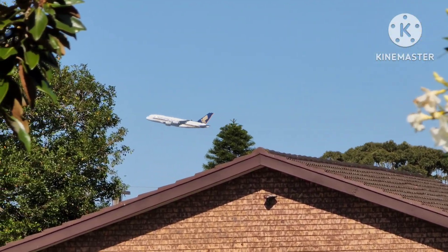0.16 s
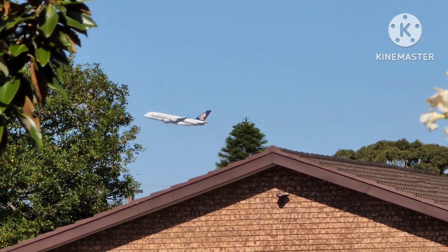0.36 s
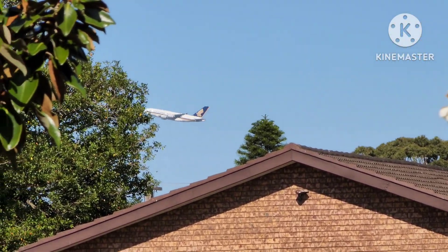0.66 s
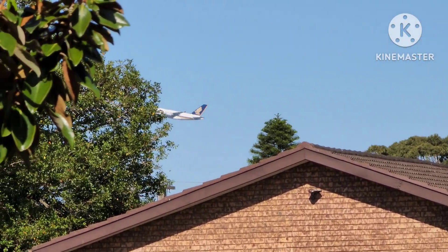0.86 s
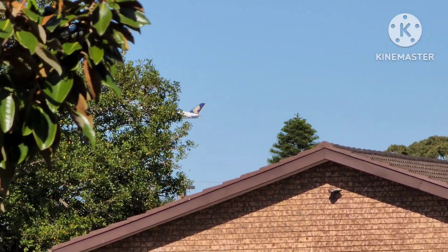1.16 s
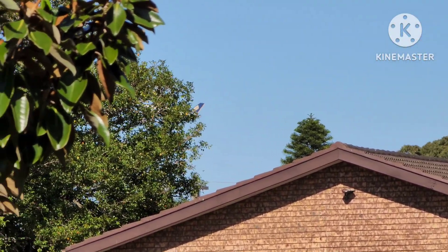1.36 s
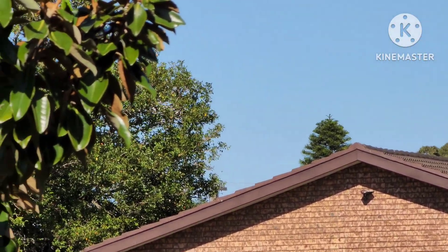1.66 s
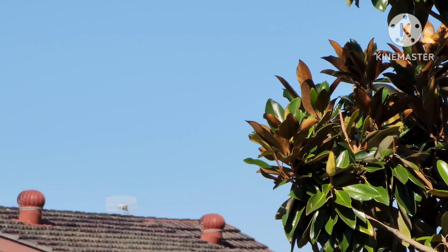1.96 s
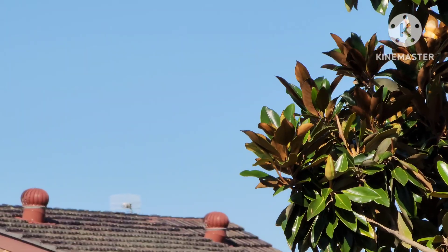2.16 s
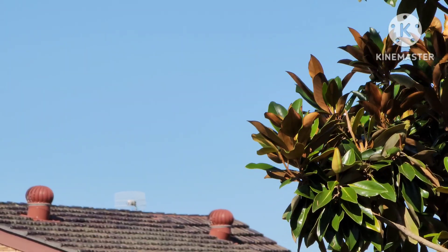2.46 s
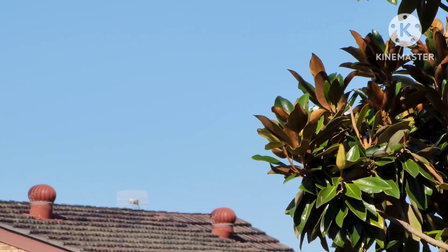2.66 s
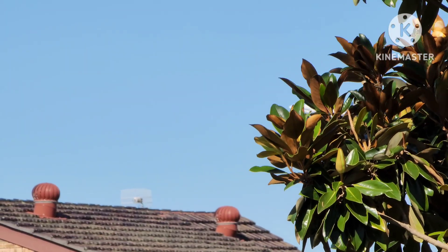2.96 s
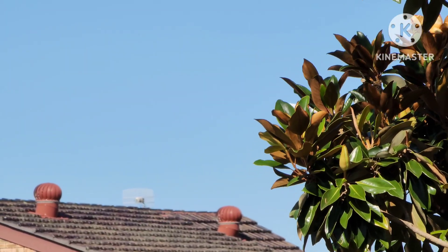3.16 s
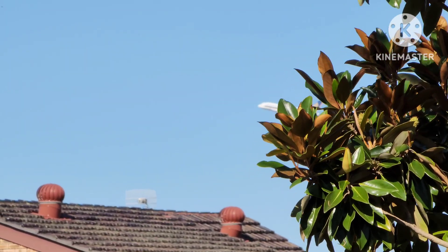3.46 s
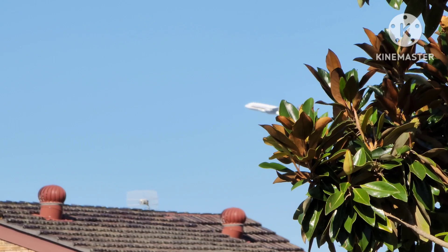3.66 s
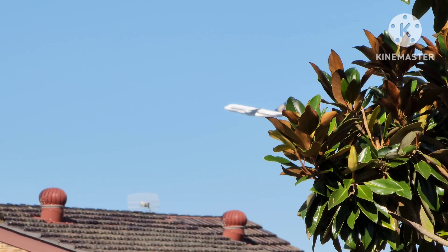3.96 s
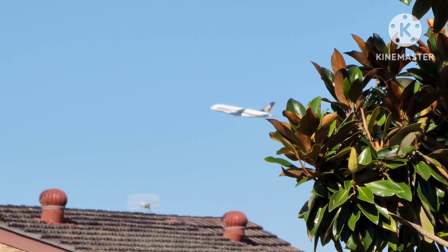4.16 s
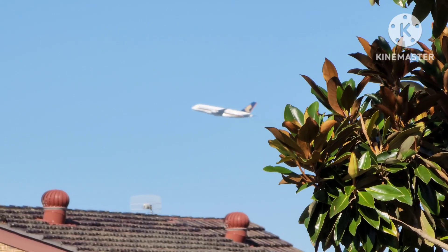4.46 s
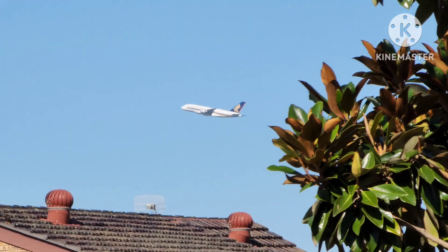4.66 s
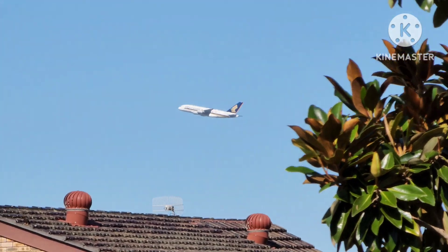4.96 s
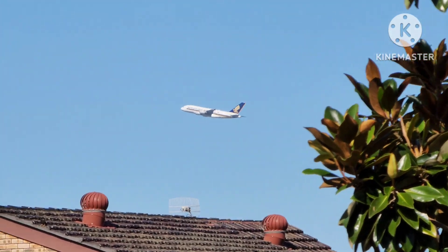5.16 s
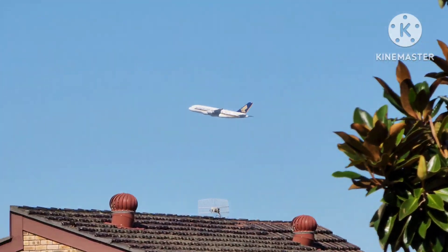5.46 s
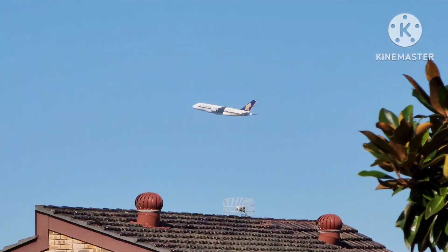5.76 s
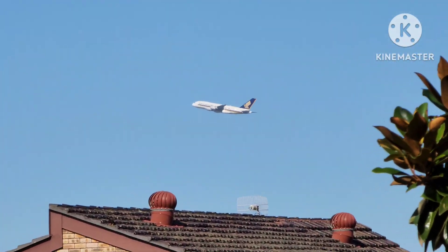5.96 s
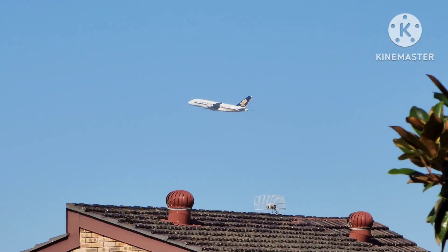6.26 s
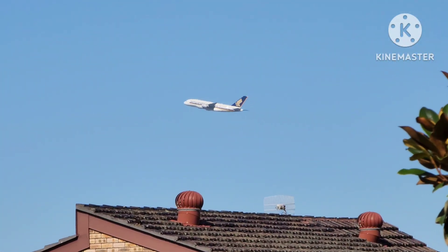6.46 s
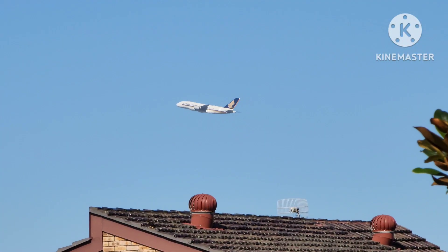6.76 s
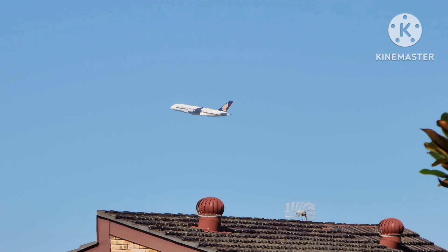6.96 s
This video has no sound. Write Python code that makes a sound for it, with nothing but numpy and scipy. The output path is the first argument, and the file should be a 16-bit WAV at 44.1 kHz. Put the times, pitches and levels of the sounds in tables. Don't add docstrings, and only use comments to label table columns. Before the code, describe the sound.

Distant jet airliner rumbles and drones low over gardens, wind thumping the microphone, leaves rustling, then a hard cut and a close bird warbling and buzzing.

```python
import sys
import numpy as np
from scipy import signal
from scipy.io import wavfile
from scipy.ndimage import uniform_filter1d

SR = 44100
rng = np.random.default_rng(int(sys.argv[2]) if len(sys.argv) > 2 else 0)


def bounce(signal):
    frames = np.transpose(np.atleast_2d(signal))
    limited = np.clip(frames, -1, 1)
    pcm = np.round(limited * 32767).astype(np.int16)
    wavfile.write(sys.argv[1], SR, pcm)


def undo_db(level):
    steps = np.asarray(level, float) / 20
    return 10 ** steps


N = 313551
CUT_S = 1.9105


def evened(x):
    return x / np.sqrt(np.mean(x ** 2) + 1e-20)


def read(points, hz):
    f, value = np.transpose(points)
    return np.interp(np.log(hz + 1), np.log(f + 1), value)


def follow(rows):
    s, *columns = np.transpose(rows)
    return [np.interp(np.arange(N) / SR, s, c) for c in columns]


def panned(x, db):
    return x * undo_db(np.array([db / 2, -db / 2]).reshape(2, -1))


def add(mix, s, sound):
    part = mix[:, round(s * SR):][:, :sound.shape[1]]
    part += sound[:, :part.shape[1]]


def resonate(x, hz, width_hz):
    r = np.exp(-np.pi * width_hz / SR)
    return 2 * signal.lfilter([1 - r], [1, -r * np.exp(2j * np.pi * hz / SR)], x).real


def resonate_twice(x, hz, first_width_hz, second_width_hz):
    return resonate(resonate(x, hz, first_width_hz), hz, second_width_hz)


def swell(peak_s, peak_db, rise_db_per_s, fall_db_per_s):
    t = np.arange(N) / SR - peak_s
    return undo_db(peak_db + np.minimum(rise_db_per_s * t, -fall_db_per_s * t))


def noise(shape, lo_hz, hi_hz, patchy_db, steady_s=0):
    # hz, left_right_correlation
    port_likeness = [(60, 0.68), (150, 0.75), (380, 0.85), (950, 0.048), (2380, -0.11), (5980, -0.033),
                     (15000, -0.022)]
    frames, hz = N // 512 + 5, np.fft.rfftfreq(2048, 1 / SR)
    a, b, c, d, patches = rng.standard_normal((frames, 1025, 5)).T
    patches = uniform_filter1d(patches, size=20, axis=0)
    patches = evened(uniform_filter1d(patches, size=8, axis=1))
    same = np.clip(read(port_likeness, hz), -1, 1)[:, None]
    left = a + 1j * b
    right = same * left + np.sqrt(1 - same ** 2) * (c + 1j * d)
    z = np.array([left, right]) * undo_db(read(shape, hz)[:, None] + patchy_db * patches)
    power = abs(z.mean(0)) ** 2
    inside = np.sum(power[(hz > lo_hz) & (hz < hi_hz)]) / np.sum(power)
    x = signal.istft(z, nperseg=2048, noverlap=1536)[1][:, :N]
    if steady_s:
        x = x / np.sqrt(abs(uniform_filter1d(x.mean(0) ** 2, round(steady_s * SR))) + 1e-20)
    return x / np.sqrt(np.mean(x.mean(0) ** 2) * inside)


def jet():
    # time_s, roar_db
    roar_curve = [(0.0, -34.5), (0.22, -49), (0.32, -32.5), (1.3, -37), (1.42, -28), (1.5, -40),
                  (1.94, -25), (2.14, -15.5), (2.26, -21), (2.79, -20.5), (3.3, -26), (3.98, -33.5),
                  (4.04, -25), (4.5, -31.5), (4.99, -31), (5.54, -30.5), (6.3, -30), (7.11, -30.5)]
    # hz, db_per_hz
    roar_shape = [(35, -11.5), (60, -7.5), (91, 5), (114, 5), (183, 3), (247, -8.5), (384, -20.5),
                  (499, -27.5), (1200, -47), (1560, -84), (2640, -120)]
    # hz, db_per_hz
    wash_shape = [(290, -27), (500, -2), (904, -4), (2210, -9.5), (2560, -13.5), (6000, -29.5),
                  (7450, -34.5), (10700, -34), (14700, -61), (15800, -48)]
    body_db, body_follows, body_lag_s = -45, 0.77, 0.48
    wash_start_db, wash_rise_db_per_s = -57.5, 0.5862

    roar_db, = follow(roar_curve)
    trend_db = uniform_filter1d(roar_db, round(body_lag_s * SR)) - roar_db.mean()
    wash_db = wash_start_db + wash_rise_db_per_s * np.arange(N) / SR
    low_shape = [p for p in roar_shape if p[0] < 330] + [(420, -53)]
    body_shape = [(220, -13.5)] + [p for p in roar_shape if p[0] > 270] + [(1800, -66.0)]
    low = undo_db(roar_db - 4.0) * noise(low_shape, 100, 300, 0.79, steady_s=0.13)
    body = undo_db(body_db + body_follows * trend_db) * noise(body_shape, 300, 900, 2.3)
    wash = undo_db(wash_db) * noise(wash_shape, 765, 2030, 2.3)
    return low + body + wash


def drone():
    # time_s, first_db, fifth_above_db
    line_curve = [(0.26, -39, -36), (0.33, -25.5, -34.5), (0.97, -25.5, -43), (1.29, -31.5, -43),
                  (1.44, -23.5, -50), (1.52, -56, -49), (1.86, -56, -32), (1.93, -47, -23.5),
                  (2.05, -50, -40), (2.14, -24, -20), (2.51, -25.5, -31.5), (3.64, -28, -29),
                  (3.98, -41, -35.5), (4.05, -19, -30), (4.2, -34.5, -33), (5.3, -37.5, -41.5),
                  (5.42, -29.5, -34.5), (7.11, -27.5, -27)]
    before_hz, after_hz, sag_hz_per_s = 95.33, 93.8, 0.65
    port_lag_rad = -0.3

    first_db, fifth_db = follow(line_curve)
    t = np.arange(N) / SR - CUT_S
    hz = np.where(t < 0, before_hz, after_hz - sag_hz_per_s * t)
    waver_hz = 0.616 * evened(uniform_filter1d(rng.standard_normal(N), size=3000))
    phase_rad = 2 * np.pi * np.cumsum(hz + waver_hz) / SR - np.array([[0], [port_lag_rad]])
    upper = np.sin(1.5 * phase_rad)
    upper = upper + undo_db(-13.5) * np.sin(2 * phase_rad[0]) + undo_db(-15.0) * np.sin(3 * phase_rad)
    return np.sqrt(2) * (undo_db(first_db - 0.4) * np.sin(phase_rad) + undo_db(fifth_db - 0.5) * upper)


def wind():
    # peak_s, peak_db, left_right_db
    deep_gusts = [(0.45, -22, -7.5), (0.77, -38, 6), (1.53, -22, -6), (1.67, -37, 3), (1.82, -17, -7),
                  (2.28, -22, 4), (2.93, -29, -5), (3.2, -29, -1), (3.68, -29, -8), (3.87, -32, 6),
                  (4.11, -33, 14), (4.45, -32, -3), (4.6, -31, -9), (4.75, -22.5, -2), (5.15, -29.5, -8),
                  (5.37, -47, -1), (5.8, -26, 4), (6.4, -35, 2), (6.63, -36, 8), (6.81, -30, -3)]
    # peak_s, peak_db, left_right_db
    upper_gusts = [(0.51, -25, 9.5), (0.77, -29.5, 8), (1.5, -27.5, 12), (1.68, -15.5, -4), (1.85, -24, 9),
                   (2.28, -32, 0), (2.75, -19.5, 1), (2.93, -21.5, 8), (3.2, -22, -1), (3.68, -23.5, -1),
                   (3.84, -27.5, 7.5), (4.16, -19, -8), (4.45, -23.5, 5), (4.65, -19.5, -2.5),
                   (4.9, -28.5, 0), (5.05, -34, -6), (5.41, -24, -4), (5.8, -25.5, -1), (6.35, -35.5, 2),
                   (6.63, -30.5, -2), (6.81, -31, -19)]
    lull_db, rise_db_per_s, fall_db_per_s = -41.5, 160, 183

    out = 0
    for gusts, hz, width_hz in ((deep_gusts, 40, 26), (upper_gusts, 70, 28)):
        push = undo_db(lull_db)
        for s, db, pan_db in gusts:
            push = push + panned(swell(s, db, rise_db_per_s, fall_db_per_s), pan_db)
        shared, left, right = rng.standard_normal((3, N))
        lumps = resonate_twice(0.9 * shared + np.array([left, right]), hz, width_hz, 1.37 * width_hz)
        lumps = lumps - uniform_filter1d(lumps, size=1500, axis=1)
        size = np.sqrt(abs(uniform_filter1d(lumps ** 2, size=9000, axis=1)) + 1e-20)
        out = out + undo_db(1.0) * push * lumps / size
    t = np.arange(N) / SR - CUT_S
    opening = np.where(t < 0, 1, 1 - np.exp(-abs(t) / 0.15))
    return out * uniform_filter1d(opening, size=120)


def leaves():
    # peak_s, peak_db, rise_db_per_s, fall_db_per_s
    puffs = [(0.0, -57.5, 493, 498), (0.155, -51, 6000, 596), (0.31, -67.5, 36, 305), (0.65, -80, 39, 249),
             (0.76, -78, 298, 400), (0.93, -56.5, 800, 226), (1.07, -64, 160, 102), (1.27, -69.5, 350, 14),
             (1.43, -63, 450, 300), (1.84, -66.5, 3.5, 56), (1.91, -65.5, 700, 6), (2.3, -74, 16, 11),
             (2.65, -58, 107, 102), (2.9, -70.5, 32, 22.5), (3.35, -67, 23, 58), (3.7, -68, 31, 42),
             (3.8, -74, 32, 4), (7.02, -60, 200, 20), (7.11, -52.5, 118, 100)]
    # hz, db_per_hz
    hiss_shape = [(590, -9.5), (1000, -1.5), (1100, -5.5), (1550, -3.5), (2400, -6), (3600, -11),
                  (5000, -14.5), (10500, -23), (14700, -32), (15800, -22.5)]
    still_db = -102.5
    breeze = undo_db(still_db) + np.sqrt(sum(swell(*puff) ** 2 for puff in puffs))
    return undo_db(-3.5) * breeze * noise(hiss_shape, 8620, 16000, 3.73)


def insects():
    level_db, shaded_db, hz = -73.5, -2, 7440
    fine = evened(resonate_twice(rng.standard_normal((2, N)), hz, 150, 150))
    return undo_db(level_db + shaded_db * (np.arange(N) > CUT_S * SR)) * fine


def scuffs():
    # start_s, peak_db, left_right_db, centre_hz
    scuff_events = [(0.156, -40, 0.5, 1600), (0.8986, -39, 1, 3770), (0.92, -28.5, -4, 3810),
                    (0.932, -36, -3, 2400), (0.962, -38, -2, 3850), (1.035, -34, -6, 4670),
                    (1.2983, -47, -2, 2560), (1.424, -38, -1.0, 2580), (1.5324, -33.5, -1, 4610),
                    (1.7197, -36, 1.0, 2828), (1.787, -36.5, 3, 2697)]
    t60_s, attack_s = 0.13, 0.004
    out, t = np.zeros((2, N)), np.arange(SR // 4) / SR
    for s, db, pan_db, hz in scuff_events:
        grit = rng.standard_normal((2, len(t))) * undo_db(2.5 * rng.exponential(1, len(t)))
        grit = evened(resonate_twice(grit, hz, 4200, 9000))
        fading = undo_db(db - 11.5 - 60 * t / t60_s) * np.minimum(t / attack_s, 1)
        add(out, s, panned(grit * fading, pan_db))
    return out


def ticks():
    # start_s, peak_db, left_right_db, centre_hz
    tick_events = [(.755, -60, -2, 12500), (0.904, -59, -.5, 9000), (1.099, -60, -2.5, 8000),
                   (1.2335, -61, -2.5, 11000), (1.262, -54, -2, 11000), (1.297, -52, -2, 12500),
                   (1.329, -52, -4, 9700), (1.361, -53, -3, 10500), (1.385, -53, 1.1, 12500),
                   (1.425, -49, -3.5, 9500), (1.437, -50, -3.5, 11000), (1.534, -50, -4.5, 12000),
                   (1.567, -56, -3, 9500), (1.6375, -52.5, -3, 11000), (1.681, -52, -3.5, 9000),
                   (1.719, -52, -1, 11500), (1.788, -55, -1.5, 12000), (1.8226, -52, -2, 11000),
                   (6.985, -55, .5, 9000), (7.056, -50, .5, 14000)]
    t60_s, width_hz = 0.035, 4500
    out, t = np.zeros((2, N)), np.arange(SR // 20) / SR
    for s, db, pan_db, hz in tick_events:
        snap = evened(resonate_twice(rng.standard_normal((2, len(t))), hz, width_hz, width_hz))
        add(out, s, panned(snap * undo_db(db - 2.5 - 60 * t / t60_s), pan_db))
    return out


def scene_change():
    click_db, click_decay_s, pan_db = -24.5, 0.0001, -9
    thump_db, thump_hz, thump_t60_s = -5, 100, 0.072
    thump_rise_s, thump_turn = 0.003, 0.09
    out = np.zeros((2, N))
    click = undo_db(click_db) * np.exp(-np.arange(400) / SR / click_decay_s)
    add(out, CUT_S, panned(click, pan_db))
    t = np.arange(SR // 5) / SR
    envelope = undo_db(thump_db - 60 * t / thump_t60_s) * (1 - np.exp(-t / thump_rise_s))
    thump = envelope * np.cos(2 * np.pi * (thump_hz * t + thump_turn))
    add(out, CUT_S, panned(thump, pan_db))
    return out


def note(motion, tone, length_s, rms_db, from_hz, to_hz):
    depth_hz, hops_per_s, lean, abruptness, loss_db, start_turn = motion
    upper_octave_db, lower_octave_db, twelfth_db, flutter_db, pan_db, fade_db = tone
    edge_s = 0.0034
    t = np.arange(0, length_s, 1 / SR)
    slow = uniform_filter1d(rng.standard_normal((3, SR // 4)), size=250, axis=1)
    drift, wobble, flutter = slow[:, :len(t)] * 16
    swing = -np.cos(2 * np.pi * (hops_per_s * t + start_turn + 0.09 * drift))
    low = (1 + np.tanh(abruptness * (swing - lean))) / 2
    hz = np.linspace(from_hz, to_hz, len(t)) * (1 + 0.006 * wobble) - depth_hz * low
    phase_rad = 2 * np.pi * np.cumsum(hz) / SR
    octave_db = upper_octave_db + (lower_octave_db - upper_octave_db) * low
    voice = np.sin(phase_rad) + undo_db(octave_db) * np.sin(2 * phase_rad)
    voice = voice + undo_db(twelfth_db) * np.sin(3 * phase_rad)
    hop_loss_db = loss_db * 4 * low * (1 - low)
    effort = undo_db(rms_db - hop_loss_db + flutter_db * flutter + fade_db * (t / length_s - 0.4))
    edges = signal.windows.tukey(len(t), min(2 * edge_s / length_s, 1))
    return panned(np.sqrt(2) * effort * voice * edges, pan_db)


def birds():
    # start_s, length_s, rms_db, start_top_hz, end_top_hz
    far = ((28, 53, 0.11, 0.81, 1.2, 0.11), (-1, 6, -30, 1, .1, 2), [ (2.18, 0.098, -60, 2190, 2212),
            (2.27, 0.06, -61, 2364, 2430)])
    whistle = ((42.4, 25, 0.066, 1.35, 6.4, 0.046), (-28.5, -51, -46, 3, 0.5, 3),
                [ (3.09, 0.033, -53, 1840, 1800), (6.683, .009, -42, 2690, 2590),
                (3.588, 0.072, -49.5, 2780, 2763), (3.671, 0.012, -31.5, 2790, 2740),
                (3.684, 0.0157, -35.5, 2600, 2150), (3.645, .024, -47, 2500, 2550),
                (3.768, .012, -39, 2500, 3350), (6.036, 0.013, -45.5, 2480, 2300),
                (4.485, .045, -57, 3870, 3850), (5.174, .011, -50, 2760, 2700),
                (5.2, 0.012, -43, 2780, 2740), (5.226, .018, -45.5, 2760, 2685),
                (4.5, .014, -51, 2800, 2800), (4.9, 0.015, -54, 3000, 3000),
                (3.699, 0.014, -33.5, 2040, 2000), (3.79, 0.016, -38, 2800, 2700),
                (3.826, .026, -36, 2900, 2700), (3.808, 0.02, -36, 2900, 3100),
                (3.995, 0.02, -47, 2210, 2250), (4.41, 0.043, -63, 2800, 3130),
                (4.885, 0.061, -62, 2800, 2820), (4.9, 0.02, -46.5, 2235, 2260),
                (5.92, 0.11, -59, 3130, 3140), (6.046, 0.023, -33, 2253, 2203),
                (6.533, 0.021, -39, 2240, 2280), (6.69, 0.0407, -49.5, 3050, 2700),
                (6.185, 0.025, -46, 2780, 2400), (6.825, 0.035, -49, 2200, 2060),
                (3.716, 0.062, -45, 2120, 2100), (6.518, 0.018, -47, 2250, 2400),
                (6.21, .07, -59, 3030, 3000), (3.392, 0.013, -39, 2950, 2700)])
    beaded = ((40, 30, .1, 0.91, 3.1, 0.22), (-29, -29, -36, 1.3, -.5, -1),
               [ (3.124, .026, -40.5, 1986, 1940), (3.15, .015, -41, 1950, 2150),
               (3.17, .024, -38.5, 2030, 2120), (3.195, 0.02, -37, 2200, 2200),
               (3.222, .016, -37.5, 2190, 2380), (3.24, .02, -44, 2440, 2390),
               (3.256, .018, -39.5, 2300, 2350), (3.272, 0.028, -42.5, 2485, 2440),
               (3.59, .065, -50.5, 1940, 2300)])
    warble = ((1100, 36, .3, 1.166, 2.8, .4), (-32, -13, -27, 3, 2.5, 8),
               [ (3.353, 0.0694, -41, 3050, 2916), (5.165, 0.082, -50.5, 2780, 2763),
               (5.617, .072, -52, 2800, 2740), (3.792, 0.068, -45, 3200, 3200)])
    stroke = ((48, 98, .1, 0.83, 3, 0.15), (-38, -20, -40, 0, 2.5, 1), [ (3.333, 0.007, -38.5, 3720, 3900),
               (3.351, .009, -37.5, 3910, 3860), (3.381, 0.008, -47, 4080, 4050),
               (3.408, 0.0085, -48, 4130, 4000), (3.416, 0.015, -36, 2836, 2780),
               (5.144, .011, -43, 3520, 3980), (5.157, 0.017, -45, 4250, 3420),
               (5.188, 0.012, -47, 4240, 3550), (5.213, 0.016, -45.5, 4400, 3580),
               (5.643, 0.008, -53, 4150, 3870), (5.672, .012, -54, 4240, 3820),
               (5.682, 0.012, -44, 2758, 2650)])
    trill = ((900, 52.6, 0.6, 2.5, 5.2, .52), (-14, -22, -27, 2.5, 0.5, -3),
              [(3.774, .094, -39.5, 3398, 3010)])
    held = ((162, 52.6, 0.696, 3.2, 3.5, 0.627), (-16, -21, -29, 3, -1.5, 3.5),
             [ (6.129, .082, -43.5, 3150, 2950), (6.614, 0.072, -37.5, 3116, 3100)])
    blip = ((800, 38, -.4, 1.6, 2, .1), (-30, -20, -39.5, 2, 1.5, 2), [ (6.143, .014, -46, 2900, 2850),
             (6.162, 0.014, -43, 2990, 2940), (6.182, 0.014, -42.5, 3000, 2950),
             (6.2, .012, -48, 2900, 3000), (6.624, .013, -44, 3000, 2950), (6.642, 0.013, -44, 3040, 2980),
             (6.661, 0.013, -41, 3000, 2960), (3.776, .012, -46, 2950, 2900),
             (3.789, .014, -42, 2950, 2900), (3.81, .014, -43, 2950, 2900), (3.83, .013, -42, 3100, 3100),
             (3.848, .016, -45, 2950, 2900)])
    hook = ((150, 60, .1, 1, 5, .1), (-30, -40, -46, 5, .5, 0), [ (4.175, .045, -47, 2480, 2250),
             (4.222, .022, -44, 2000, 1900), (4.42, 0.057, -46, 2450, 1950), (4.66, 0.038, -46, 2350, 2000),
             (4.265, .04, -48, 2800, 2850), (4.14, .025, -48, 2450, 2450), (6.41, 0.08, -60, 3400, 3550),
             (6.93, .04, -48, 2450, 2520), (6.972, .025, -56, 3300, 3600), (5.614, .014, -51, 2050, 2050),
             (5.645, .011, -50, 2050, 2050), (5.673, .014, -47, 2100, 2000)])
    buzz = ((500, 71, 0.3, 1.05, 1.2, 0.35), (-29, -34.5, -33.5, 1.5, 0.3, -1),
             [ (4.029, 0.083, -37, 2442, 2460), (4.248, 0.084, -38, 2590, 2468),
             (4.473, 0.0746, -35.5, 2428, 2490), (4.704, 0.078, -36.5, 2400, 2490),
             (4.947, 0.078, -36.5, 2397, 2411), (5.95, 0.064, -50, 2440, 2430),
             (6.424, 0.086, -49, 2382, 2362), (6.877, 0.055, -43, 2450, 2500)])
    chip = ((1380, 171.5, -0.32, .9, 3, 1), (-13, -16.5, -15, 0.5, -5, -13.5),
             [ (5.225, 0.053, -44.5, 6350, 6330), (5.409, 0.065, -47, 6270, 6210),
             (5.538, 0.061, -49, 6370, 6260)])
    dry = np.zeros((2, N))
    for motion, tone, rows in (whistle, beaded, warble, stroke, trill, held, blip, hook, buzz, chip, far):
        for s, *row in rows:
            add(dry, s, note(motion, tone, *row))
    return dry


def yard(dry):
    # hz, t60_s
    yard_decay = [(2000, 0.8), (3000, .8), (4500, 0.52), (8000, 0.45)]
    ground_s, ground_db = 0.00403, -2.5
    walls_s, walls_db, yard_db = 0.009, -6.5, -7

    near = dry + undo_db(ground_db) * np.roll(dry, round(ground_s * SR), axis=1)
    when, side = rng.random((2, 7))
    mono = near.mean(0)
    walls = sum(np.sign(x - 0.5) * np.roll(mono, round(s * SR)) for s, x in zip(when * walls_s, side))
    near = near + undo_db(walls_db) / np.sqrt(len(when)) * walls * np.array([[1], [-1]])

    taps = np.zeros((2, SR))
    at = np.arange(300, SR - 40, 40) + rng.integers(0, 40, (2, (SR - 301) // 40))
    np.put_along_axis(taps, at, rng.standard_normal(at.shape), 1)
    hz, t, z = signal.stft(taps, SR, nperseg=256)
    tail = signal.istft(z * undo_db(-60 * t / read(yard_decay, hz)[:, None]), SR, nperseg=256)[1]
    stirred = evened(0.8 + evened(resonate_twice(rng.standard_normal(N), 170, 200, 200)))
    echoes = signal.fftconvolve(near * stirred, tail / np.linalg.norm(tail[0]), axes=1)[:, :N]
    return near + undo_db(yard_db) * echoes


def scene():
    return jet() + drone() + wind() + leaves() + insects() + scuffs() + ticks() + yard(birds())


def thinned(x):
    # hz, share_of_local_level
    drop_share = [(800, .06), (2200, .11), (4000, .2), (6000, .35), (8800, .42), (10300, .85), (11500, 1.3),
                  (14200, 1.0), (15300, 3)]
    hop, offset = 1024, 952
    k = np.arange(hop) + 0.5
    n = np.arange(2 * hop) + 0.5
    window = np.sin(np.pi * n / (2 * hop))[:, None]
    basis = window * np.cos(np.pi / hop * np.outer(n + hop / 2, k)) * np.sqrt(2 / hop)
    lead = 2 * hop - offset
    halves = np.pad(x, ((0, 0), (lead, 2 * hop - (lead + N) % hop))).reshape(2, -1, hop)
    lines = np.concatenate([halves[:, :-1], halves[:, 1:]], axis=2) @ basis
    local_power = uniform_filter1d(uniform_filter1d(lines ** 2, size=24, axis=2), size=5, axis=1)
    local = np.sqrt(abs(local_power) + 1e-20)
    thrift = uniform_filter1d(rng.standard_normal((lines.shape[1], hop // 4)), size=5, axis=0)
    thrift_db = 8.0 * evened(thrift).repeat(4, axis=1)
    least = local * read(drop_share, k * SR / 2 / hop) * undo_db(thrift_db)
    frames = (lines * (abs(lines) > least)) @ basis.T
    joined = frames[:, 1:, :hop] + frames[:, :-1, hop:]
    return joined.reshape(2, -1)[:, lead - hop:][:, :N]


def roll_off(x):
    return signal.sosfilt(signal.butter(12, 16670, fs=SR, output="sos"), x)


def record(dry):
    edge_hz = 15570
    lowpass = signal.firwin(1023, edge_hz, window=("kaiser", 8), fs=SR)
    limited = thinned(signal.oaconvolve(dry, lowpass[None], "same"))
    return roll_off(limited + scene_change())


dry = scene()
out = record(dry)
bounce(out)
```